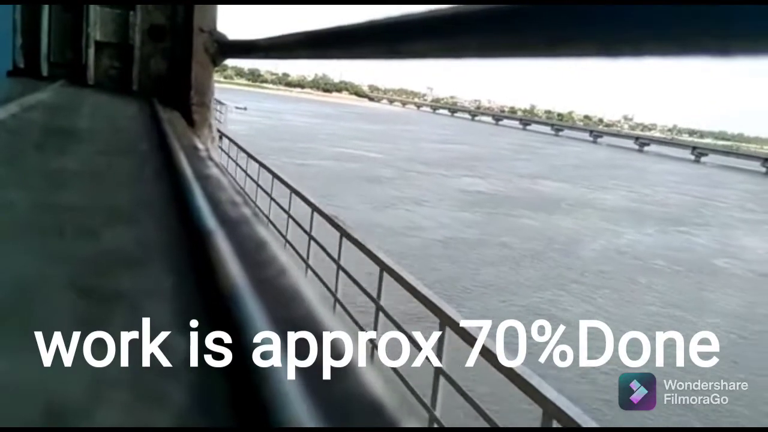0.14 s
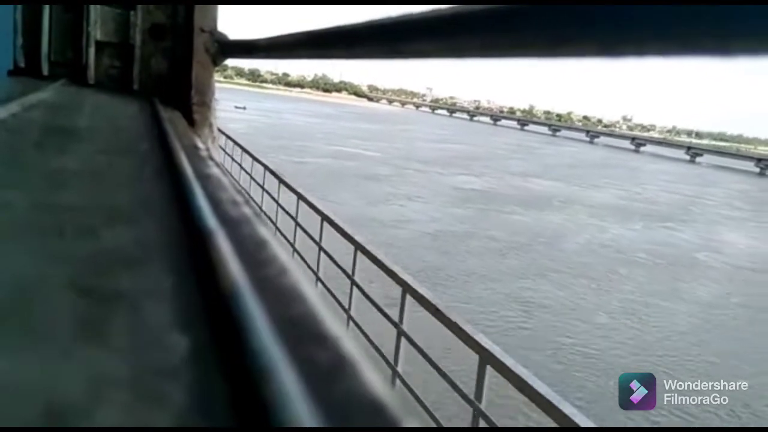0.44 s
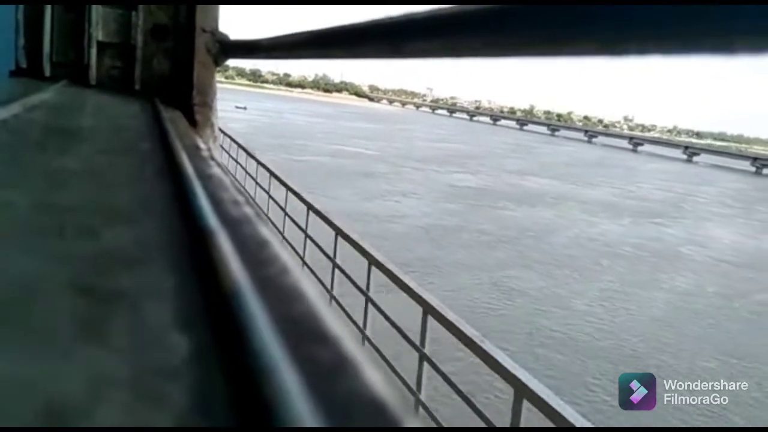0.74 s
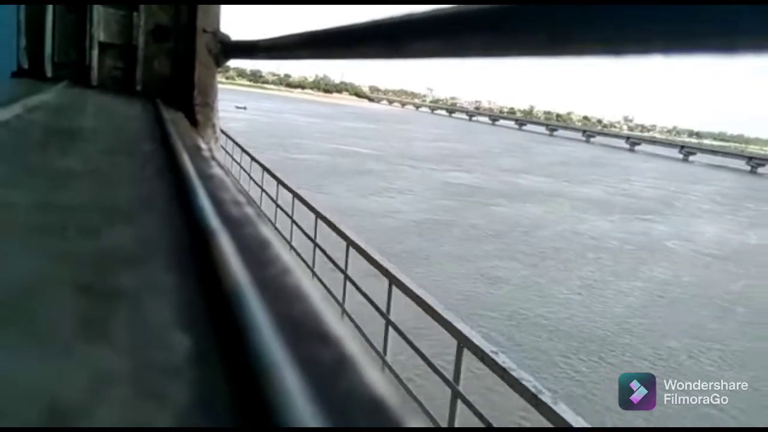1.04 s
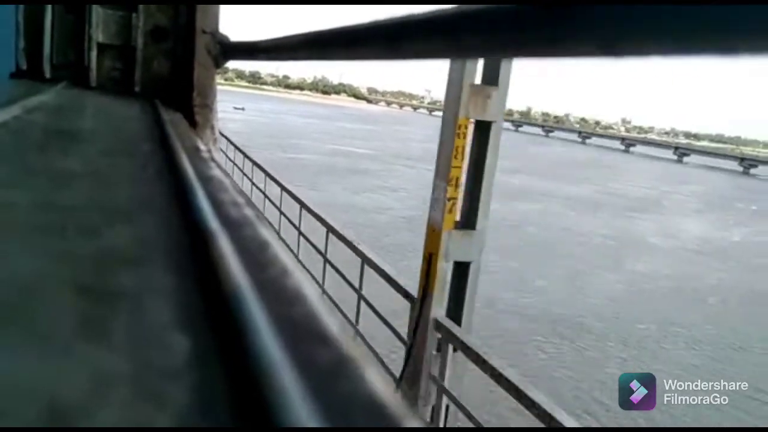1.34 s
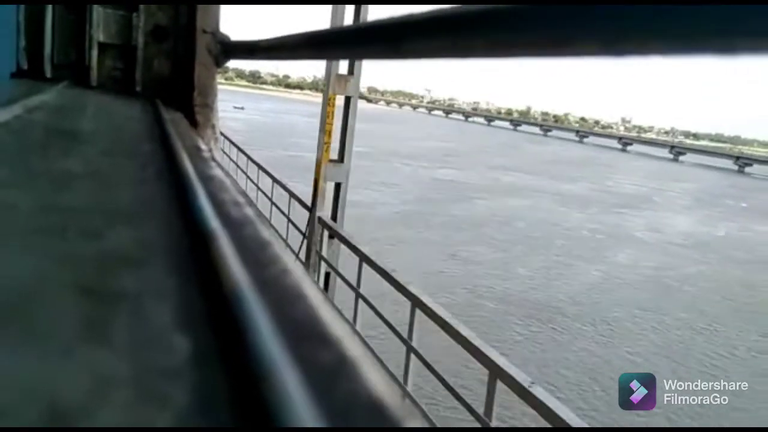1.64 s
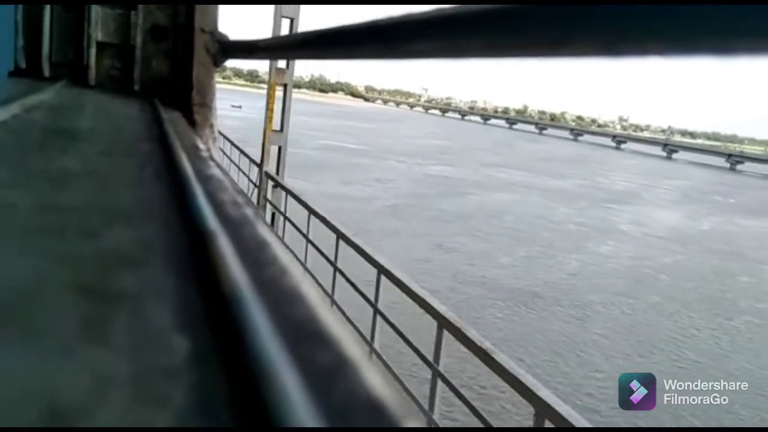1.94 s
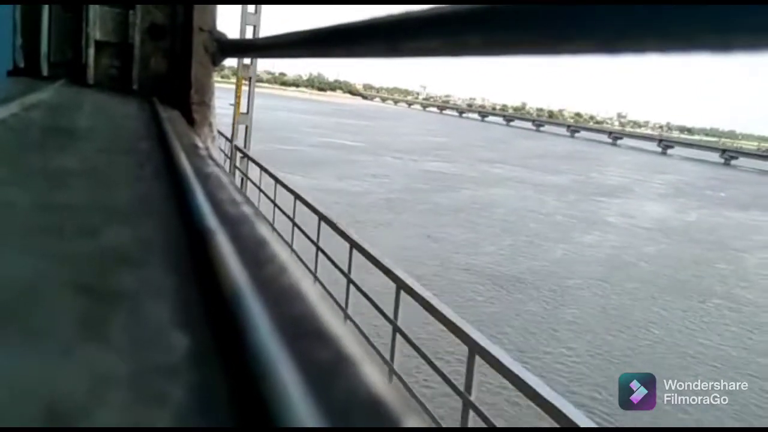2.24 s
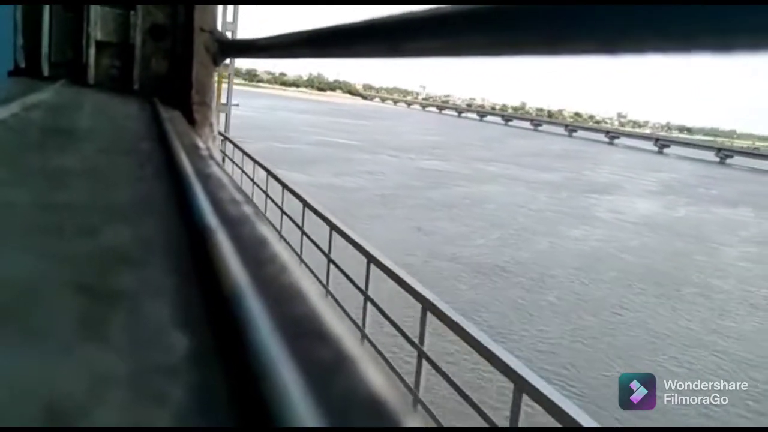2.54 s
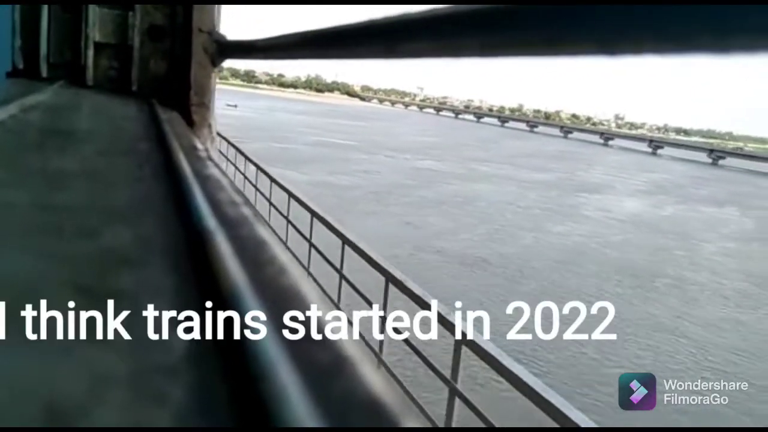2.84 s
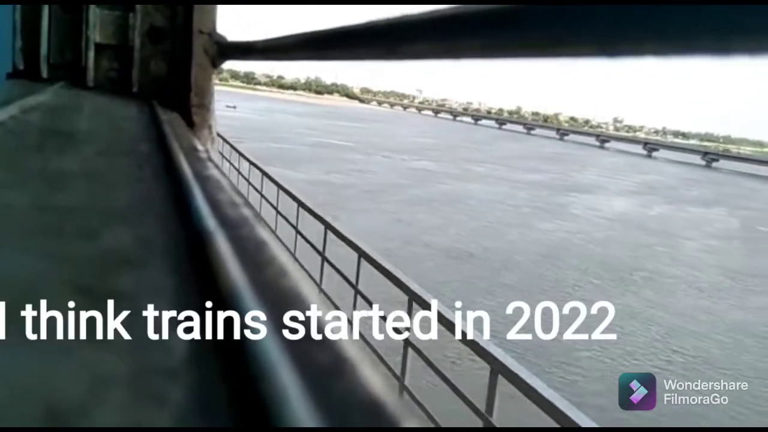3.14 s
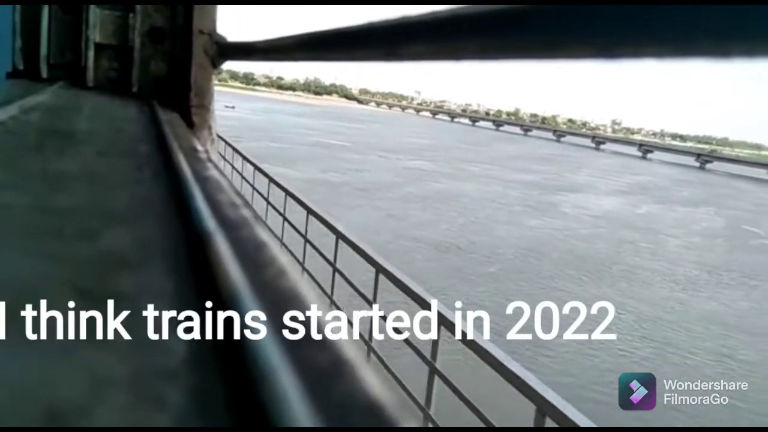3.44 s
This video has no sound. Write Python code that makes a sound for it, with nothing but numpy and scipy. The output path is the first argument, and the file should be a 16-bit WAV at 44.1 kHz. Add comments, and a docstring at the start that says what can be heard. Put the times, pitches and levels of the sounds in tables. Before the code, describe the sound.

A train rumbles low and loud over a steel bridge, with loose ironwork clanking and ringing

```python
"""A train rolls over a steel bridge, heard from an open doorway of a carriage. Wheels shake the girders:
bands of noise rumble low, with passing narrow low tones within them. A faint airy hiss lies above, and a rail
sings as noise passes through its resonances. Joints and loose ironwork clank in short noise bursts that shake
many resonances; single metal parts ring or squeal, steady or rough, and there are a few dull thumps.
Fast gain control holds the loud moments down, and the highest treble is cut."""
import sys
import numpy as np
from scipy import signal
from scipy.fft import rfft, irfft
from scipy.io import wavfile
from scipy.ndimage import uniform_filter1d, minimum_filter1d

SR = 44100
rng = np.random.default_rng(int(sys.argv[2]) if len(sys.argv) > 2 else 0)


def transcribe(signal):
    """Save signal, clipped to [-1, 1], as a 16-bit WAV file at the path in sys.argv[1]."""
    frames = np.atleast_2d(signal).T
    limited = np.clip(frames, -1, 1)
    pcm = np.round(limited * 32767).astype(np.int16)
    wavfile.write(sys.argv[1], SR, pcm)


N = 158760  # samples, 3.6 s


def undb(db):
    """Turn dB into a plain gain."""
    return 10 ** (np.asarray(db) / 20)


def rms(x):
    """Average strength of a real or complex sound."""
    return np.sqrt(np.mean(abs(x) ** 2))


def unit(x):
    """Scale a sound to an rms of 1."""
    return x / rms(x)


def noise(size=N):
    """White noise: every pitch equally strong."""
    return rng.standard_normal(size)


def levels_over_time(table, t):
    """Every column of a time table, joined by straight lines."""
    rows = np.array(table).T
    return [np.interp(t, rows[0], column) for column in rows[1:]]


def spectrum_db(table, hz):
    """Level in dB at each pitch, joined by straight lines along the log of pitch."""
    rows = np.array(table)
    return np.interp(np.log(hz + 1), np.log(rows[:, 0]), rows[:, 1])


def walk(rate):
    """A smooth random curve with rms 1 that takes a new random value `rate` times per second."""
    step = int(SR / rate)
    held = np.repeat(noise(N // step + 1), step)
    smooth = uniform_filter1d(uniform_filter1d(held, step), step)
    return unit(smooth[:N])


def noise_bands(table, count):
    """Pairs of centre pitch and separate noise band; together the bands have the table's spectrum."""
    f = np.fft.rfftfreq(N, 1 / SR)
    centres = np.geomspace(table[0][0], table[-1][0], count)
    place = np.interp(np.log(f + 1), np.log(centres), np.arange(count), left=-1, right=count)
    gain = undb(spectrum_db(table, f))
    bands = []
    for k, hz in enumerate(centres):
        share = np.sqrt(np.clip(1 - abs(place - k), 0, 1))  # neighbours cross over
        bands.append((hz, irfft(rfft(noise()) * gain * share, N)))
    return bands


def resonances(table, size):
    """How strongly each damped resonance answers every pitch; most at its own."""
    f = np.fft.rfftfreq(size, 1 / SR)
    return np.array([undb(db) / (1 + 2j * (f - hz) / width) for hz, width, db in table])


def swell_and_fade(t, rise, hold, fall):
    """Climb 20 dB in `rise` s, hold from t = 0, then drop 20 dB per `fall` s."""
    climb_db = 20 * np.minimum(t / rise, 0)
    drop_db = 20 * np.maximum(t - hold, 0) / fall
    return undb(climb_db - drop_db)


# Loudness of the rumble: start_s, deep_level_db, middle_level_db, upper_level_db
RUMBLE_LEVELS = [(0.12, -22, -21, -31.5), (0.18, -25, -19.5, -29), (0.43, -18.5, -17.5, -24.5),
                 (0.53, -34.5, -17, -29), (0.65, -19, -17.5, -28), (0.8, -46.5, -17.5, -31.5),
                 (0.93, -21.5, -21, -32.5), (0.99, -23.5, -16.5, -29.5), (1.5, -27, -20, -33),
                 (1.56, -28, -21, -25), (1.7, -22, -17, -33.5), (1.95, -23, -26, -32.5),
                 (2.07, -31, -16, -27), (2.11, -25, -19.5, -24), (2.24, -28, -24, -34),
                 (2.4, -27, -17, -27), (2.69, -25.5, -19.5, -29), (2.79, -26.5, -22, -28),
                 (2.82, -31, -17, -36), (2.9, -27.5, -21.5, -28), (3.3, -21.5, -20, -30),
                 (3.33, -27.5, -20.5, -23.5), (3.37, -27, -23, -31), (3.5, -20, -20, -31.5)]
# Tone colour of the shaken girders: pitch_hz, relative_level_db (per Hz)
GIRDER_SPECTRUM = [(13, -47), (22, -23.5), (32, -28.5), (51, -12.5), (71, -5), (159, 0.5), (270, -2.5),
                   (360, -11), (572, -15), (610, -18.5), (715, -20), (866, -36.5), (1000, -60), (1300, -80),
                   (2200, -120)]
# Unsteadiness of the deep, middle and upper range: flicker_db (rms), changes_per_s
RUMBLE_FLICKER = [(1, 11), (1.28, 14), (3, 30)]
RUMBLE_SPLIT_HZ = 130, 330  # the borders between the ranges


def rumble(t):
    """Wheels shake the girders: three ranges follow their own levels, each band flickering."""
    ranges = [0, 0, 0]
    for hz, band in noise_bands(GIRDER_SPECTRUM, count=14):
        k = np.searchsorted(RUMBLE_SPLIT_HZ, hz)
        flicker_db, changes_per_s = RUMBLE_FLICKER[k]
        ranges[k] = ranges[k] + band * undb(flicker_db * walk(changes_per_s))
    levels = levels_over_time(RUMBLE_LEVELS, t)
    return sum(unit(part) * undb(db) for part, db in zip(ranges, levels))


# Tone colour of the airy treble: pitch_hz, relative_level_db (per Hz)
HISS_SPECTRUM = [(900, -39), (1020, -9), (1240, -4.5), (1850, -12), (2680, -6.5), (3000, -10.5),
                 (6100, -17.5), (7800, -16), (9000, -20), (10500, -29.5), (12500, -33.5), (15600, -36)]
HISS_DB = -62.5


def hiss():
    """Faint airy noise whose bands swell together and also flicker one by one."""
    swell_db = 1.9 * walk(13)
    total = sum(band * undb(swell_db + 1.7 * walk(22)) for _, band in noise_bands(HISS_SPECTRUM, count=16))
    return undb(HISS_DB) * unit(total)


# Loudness of the rail's song: start_s, relative_level_db
RAIL_LEVELS = [(0.03, -52.5), (1.17, -55.5), (1.47, -51.5), (1.76, -58), (1.92, -50.5), (2.1, -63),
               (2.26, -60), (2.84, -51.5), (3.04, -51), (3.58, -53)]
# Resonances of the rail: pitch_hz, width_hz (of a single pass), relative_level_db
RAIL_RESONANCES = [(1348, 35, -16), (1500, 82, -8.5), (1641, 95, -7.5)]


def rail(t):
    """Rolling noise makes a few rail resonances sing, each flickering in level."""
    song = 0
    for response in resonances(RAIL_RESONANCES, N):
        # two passes narrow the resonance; its peak then sets the level
        tone = unit(irfft(rfft(noise()) * response ** 2, N)) * abs(response).max()
        song = song + tone * undb(3.5 * walk(25))
    return song * undb(levels_over_time(RAIL_LEVELS, t)[0])


LOW_HZ, HIGH_HZ = 1500, 4500  # lows lie below the first, highs above the second


def tilt(hz, low_db, high_db):
    """Raise or lower a clank's lows and highs."""
    return undb(low_db / (1 + (hz / LOW_HZ) ** 6) + high_db / (1 + (HIGH_HZ / hz) ** 6))


# Resonances of the ironwork: pitch_hz, width_hz (of a single pass), relative_gain_db
IRON_RESONANCES = [(990, 50, -3.5), (1070, 170, -7), (1225, 90, -3), (1656, 230, -1.5), (1928, 170, -4),
                   (2342, 120, -1.5), (2558, 100, -5), (2866, 200, -7.5), (3267, 76, -4), (3633, 150, -5.5),
                   (4040, 100, -4.5), (4530, 78, -6), (4790, 230, -6.5), (5120, 160, -5), (5703, 110, -4.5),
                   (6020, 81, -4), (6490, 200, -8.5), (7060, 220, -12.5), (7600, 350, -9),
                   (8240, 110, -3.5), (9220, 160, -16), (9700, 150, -24), (11040, 110, -19.5),
                   (11600, 86, -21.5), (12600, 80, -38), (13500, 80, -38.5), (14500, 80, -35.5),
                   (15100, 80, -39)]
# Tone colour of the broad crash: pitch_hz, relative_level_db (per Hz)
CRASH_SPECTRUM = [(300, -23), (500, 6.5), (900, 3.5), (1200, -6.5), (1380, -18.5), (1840, -8),
                  (3000, -13.5), (4200, -6), (5000, -14), (8400, -11.5), (9200, -25), (11500, -39),
                  (15600, -43)]
# Clanks: hold_start_s, rise_s (per 20 dB), hold_s, fall_s (per 20 dB), relative_level_db,
# lows_db, highs_db
CLANK_EVENTS = [(0.209, 0.064, 0.0095, 0.03, -44, 10.5, -10), (0.732, 0.02, 0.011, 0.016, -46, 5, -7),
                (1.04, 0.027, 0.014, 0.054, -59, 12, -10.5), (1.212, 0.011, 0.0087, 0.032, -59, 1, 9.5),
                (1.359, 0.027, 0.019, .06, -58, -3.5, 2), (1.48, 0.033, 0.021, 0.074, -55.5, -20.5, -6),
                (1.597, 0.063, 0.012, 0.024, -41.5, -1, -10.5),
                (1.884, 0.049, 0.041, 0.028, -45.5, -19, -8.5), (1.99, 0.022, 0.0088, 0.064, -47, -8, -10),
                (2.078, 0.035, 0.024, 0.12, -30, 3.5, -8), (2.141, 0.024, 0.011, 0.068, -34.5, -1, -2),
                (2.189, .02, 0.013, 0.025, -41.5, -4, -10), (2.27, 0.056, 0.0092, 0.022, -47, -11.5, -5),
                (2.397, 0.014, 0.016, 0.062, -37.5, -2, -22), (2.435, 0.045, 0.04, 0.069, -46.5, -3, -3.5),
                (2.534, 0.026, 0.033, 0.21, -50, -37, -11), (2.707, 0.035, 0.013, 0.029, -61, -3, 0),
                (2.916, 0.047, 0.021, 0.027, -57, 3, -22), (2.801, 0.011, 0.0083, 0.059, -47, -14, 13),
                (2.973, 0.036, 0.029, 0.079, -29, 1.5, -7), (3.063, .02, .02, 0.046, -61, -20, -1),
                (3.167, 0.019, 0.016, 0.069, -45, 0, -6.5), (3.323, 0.12, 0.014, 0.096, -50.5, 8, -12),
                (3.487, 0.032, 0.022, 0.044, -40, -6, -13.5), (3.526, .02, 0.014, 0.089, -49.5, -3, -3)]
LEAD_S = 1 / 8  # room for the rise before a clank's hold
CRASH_DB, RESONANCE_DB = -2, 9  # balance of crash and resonances
SCATTER_DB, STAGGER_S = 2.5, .005  # random spread of the resonances in strength and time
GRIT_DB, GRIT_PER_S = 2.5, 400  # fast roughness shared by all the clanking
THROB_DB, THROB_PER_S = 3.5, 60  # slower roughness of each resonance
IDLE_DB, IDLE_SWING_DB = -75.5, 7  # shaking between clanks, before the resonances


def clanks():
    """A clank shakes each iron resonance with its own strength and timing, over a broad crash; between
    clanks the parts rattle faintly."""
    size = 2 ** 14
    t = np.arange(size) / SR - LEAD_S
    f = np.fft.rfftfreq(size, 1 / SR) + 1
    pitches = np.array(IRON_RESONANCES)[:, :1]
    count = len(pitches)
    push = np.zeros((count, N + size))
    crash = np.zeros(N + size)
    crash_colour = unit(undb(spectrum_db(CRASH_SPECTRUM, f)))
    for at, rise, hold, fall, db, low_db, high_db in CLANK_EVENTS:
        strength, late = noise((2, count, 1))
        start = int((at - LEAD_S) * SR)
        place = slice(start, start + size)
        push_gain = undb(db + SCATTER_DB * strength) * tilt(pitches, low_db, high_db)
        push[:, place] += push_gain * swell_and_fade(t - STAGGER_S * late, rise, hold, fall)
        burst = rfft(noise(size) * swell_and_fade(t, rise, hold, fall))
        coloured = irfft(burst * crash_colour * tilt(f, low_db, high_db), size)
        crash[place] += undb(db + CRASH_DB) * coloured
    grit = unit(undb(GRIT_DB * walk(GRIT_PER_S)))
    out = crash[:N] * grit
    for pushed, response in zip(push, resonances(IRON_RESONANCES, N)):
        clank = pushed[:N] * grit * undb(THROB_DB * walk(THROB_PER_S))
        rattle = undb(IDLE_DB + IDLE_SWING_DB * walk(12))
        shake = (clank + rattle) * noise()
        # two passes narrow the resonance; dividing by the peak counts its gain only once
        out += undb(RESONANCE_DB) * irfft(rfft(shake) * response ** 2 / abs(response).max(), N)
    return out


CLEAN_WIDTH_HZ = 70  # the steady share of a tone shrinks as its width grows past this scale


def throbbing_tones(t, table, rise):
    """Each tone keeps one pitch, part steady and part throbbing; the wider its pitch, the rougher."""
    out = np.zeros(N)
    for at, hold, fall, hz, width, db in table:
        start = max(int((at - rise * 2) * SR), 0)
        end = min(int((at + hold + fall * 2) * SR), N)
        now = t[start:end]
        real, imaginary = noise((2, end - start))
        lowpass = signal.butter(4, width / 2, fs=SR, output="sos")
        throb = unit(signal.sosfilt(lowpass, real + 1j * imaginary))
        clean = np.exp(-width / CLEAN_WIDTH_HZ)
        tone = ((clean + (1 - clean) * throb) * np.exp(2j * np.pi * hz * now)).real
        out[start:end] += undb(db) * swell_and_fade(now - at, rise, hold, fall) * unit(tone)
    return out


# Single metal parts that ring or squeal, and a few dull thumps (the wide rows near 700 Hz):
# hold_start_s, hold_s, fall_s (per 20 dB), pitch_hz, width_hz, level_db
RINGS_AND_THUMPS = [(0.015, 0.04, 0.02, 1340, 60, -52), (0.168, 0.17, 0.045, 6770, 40, -56),
                    (0.216, 0.022, 0.015, 6770, 30, -48), (0.272, 0.022, 0.012, 6800, 60, -52),
                    (0.22, 0.09, 0.03, 13540, 120, -82), (0.17, 0.05, 0.043, 1240, 128, -53),
                    (0.17, 0.12, 0.034, 990, 144, -45), (0.2, 0.015, 0.025, 8400, 128, -68),
                    (0.2, 0.03, 0.051, 1940, 144, -44), (0.2, 0.04, 0.06, 730, 80, -31),
                    (0.215, 0.02, 0.043, 3530, 128, -57), (0.215, 0.13, 0.05, 5650, 35, -56),
                    (0.283, 0.02, 0.02, 5650, 50, -60), (0.27, 0.03, 0.12, 1110, 90, -44),
                    (0.35, 0.11, 0.05, 570, 30, -31), (0.71, 0.04, 0.043, 1590, 192, -48),
                    (0.72, 0.03, 0.034, 4750, 128, -60), (0.73, 0.03, 0.043, 5150, 128, -61),
                    (0.735, 0.02, 0.034, 2960, 192, -55), (0.735, 0.03, 0.043, 5960, 128, -62),
                    (0.73, 0.03, 0.02, 11500, 120, -76), (0.745, 0.02, 0.034, 970, 128, -55),
                    (1.205, 0.03, 0.043, 8910, 128, -73), (1.28, 0.05, 0.03, 11600, 120, -74),
                    (1.35, 0.06, 0.043, 2350, 112, -61), (1.38, 0.03, 0.034, 2850, 112, -64),
                    (1.48, 0.05, 0.034, 7360, 96, -73), (1.485, 0.04, 0.043, 2390, 90, -53),
                    (1.558, 0.06, 0.04, 720, 300, -35), (1.57, 0.05, 0.051, 1600, 240, -42),
                    (1.585, 0.04, 0.043, 5950, 120, -55), (1.59, 0.04, 0.043, 5150, 120, -56),
                    (1.88, 0.05, 0.06, 8020, 160, -59), (1.9, 0.05, 0.034, 4640, 160, -61),
                    (1.99, 0.015, 0.034, 2370, 112, -56), (2.04, 0.02, 0.034, 3350, 128, -56),
                    (2.07, 0.05, 0.04, 700, 300, -30), (2.062, 0.05, 0.03, 4150, 260, -43),
                    (2.13, 0.085, 0.07, 4250, 300, -44), (2.1, 0.12, 0.04, 3700, 300, -44),
                    (2.24, 0.055, 0.02, 3730, 250, -45), (2.208, 0.06, 0.03, 6910, 70, -56),
                    (2.222, 0.05, 0.035, 2380, 80, -49), (2.395, 0.05, 0.05, 1000, 160, -47),
                    (2.395, 0.04, 0.02, 2400, 150, -50), (2.31, 0.09, 0.043, 3610, 200, -62),
                    (2.396, 0.045, 0.025, 1740, 240, -45), (2.4, 0.09, 0.05, 3600, 200, -54),
                    (2.41, 0.06, 0.051, 8170, 160, -61), (2.42, 0.06, 0.04, 6150, 120, -62),
                    (2.46, 0.015, 0.025, 3170, 112, -52), (2.53, 0.04, 0.043, 4280, 128, -58),
                    (2.53, 0.04, 0.043, 5100, 128, -62), (2.53, 0.05, 0.051, 3670, 160, -54),
                    (2.715, 0.02, 0.034, 6150, 96, -67), (2.772, 0.05, 0.05, 5370, 70, -55),
                    (2.885, 0.04, 0.02, 2350, 120, -58), (2.79, 0.02, 0.043, 6950, 128, -56),
                    (2.79, 0.02, 0.06, 8300, 160, -54), (2.795, 0.04, 0.02, 3760, 400, -51),
                    (2.85, 0.012, 0.02, 3900, 500, -53), (2.803, 0.025, 0.06, 7640, 80, -55),
                    (2.81, 0.015, 0.034, 3110, 128, -53), (2.9, 0.04, 0.034, 1060, 128, -50),
                    (2.94, 0.05, 0.051, 4130, 112, -49), (2.97, 0.04, 0.04, 5950, 400, -50),
                    (2.98, 0.08, 0.06, 11080, 96, -74), (3.202, 0.012, 0.01, 3430, 90, -50),
                    (3.223, 0.008, 0.012, 3430, 90, -56), (3.122, 0.015, 0.02, 8250, 150, -65),
                    (3.183, 0.015, 0.015, 6000, 120, -62), (3.202, 0.018, 0.045, 8070, 320, -48),
                    (3.26, 0.07, 0.043, 4950, 96, -70), (3.322, 0.015, 0.02, 2340, 80, -56),
                    (3.33, 0.05, 0.043, 1040, 160, -52), (3.03, 0.07, 0.03, 2300, 200, -52),
                    (3.255, 0.02, 0.015, 2500, 500, -60), (3.465, 0.05, 0.04, 4100, 170, -54),
                    (3.481, 0.02, 0.025, 2400, 112, -54), (3.472, 0.025, 0.02, 6150, 200, -60),
                    (3.49, 0.05, 0.03, 5350, 150, -59), (3.522, 0.018, 0.015, 7500, 120, -63),
                    (3.528, 0.012, 0.015, 2900, 150, -54), (3.562, 0.015, 0.015, 4750, 90, -56)]


def rings_and_thumps(t):
    """Single metal parts ring or squeal, and a few dull thumps; all start quickly (20 dB in 5 ms)."""
    return throbbing_tones(t, RINGS_AND_THUMPS, rise=.005)


# Passing narrow low tones within the rumbling noise: hold_start_s, hold_s, fall_s (per 20 dB),
# pitch_hz, width_hz, level_db
LOW_TONES = [(0.223, 0.074, .08, 134, 20, -28), (0.312, 0.19, 0.088, 238, 26, -30.5),
             (0.66, 0.075, 0.059, 143.3, 20, -23), (1.146, 0.36, .08, 99.9, 23, -25.5),
             (1.254, 0.079, 0.069, 160, 38, -23.5), (1.42, 0.21, .1, 160.2, 24, -23),
             (1.697, 0.11, .08, 128.8, 18, -24), (1.846, 0.11, 0.07, 97, 25, -26),
             (2.05, 0.053, 0.063, 310.3, 48, -24), (2.281, 0.097, 0.055, 199.8, 25, -24.5),
             (2.392, 0.2, 0.075, 160.6, 16, -22.5), (2.597, .2, .08, 129.8, 21, -23.5),
             (2.803, 0.071, 0.055, 279.3, 29, -27.5), (3.0, 0.11, .08, 169, 23, -23),
             (3.158, 0.15, 0.058, 159.4, 20, -25), (3.281, 0.074, 0.063, 280, 23, -24),
             (3.426, 0.078, .08, 118, 27, -22.5)]


def low_tones(t):
    """Passing narrow low tones within the rumbling noise, starting softly (20 dB in 40 ms)."""
    return throbbing_tones(t, LOW_TONES, rise=.04)


def scene():
    """Rumble and low tones below, thin metal above."""
    t = np.arange(N) / SR
    mix = rumble(t) + hiss() + rail(t) + clanks() + rings_and_thumps(t) + low_tones(t)
    return mix[None]


DRIVE = 1.8  # how early the gain control takes hold
TOP_HZ = 15650  # upper edge of the treble


def record(dry):
    """Fast gain control turns the whole sound down at its peaks; a steep filter cuts the top."""
    # the largest value within 500 samples (11 ms), then smoothed
    peak = uniform_filter1d(-minimum_filter1d(-abs(dry), size=500), size=500)
    held = 1.101 * dry * np.tanh(DRIVE * peak) / (DRIVE * peak + 1e-9)
    return signal.sosfilt(signal.ellip(8, .2, 70, TOP_HZ, fs=SR, output="sos"), held)


dry = scene()
out = record(dry)
transcribe(out)
```